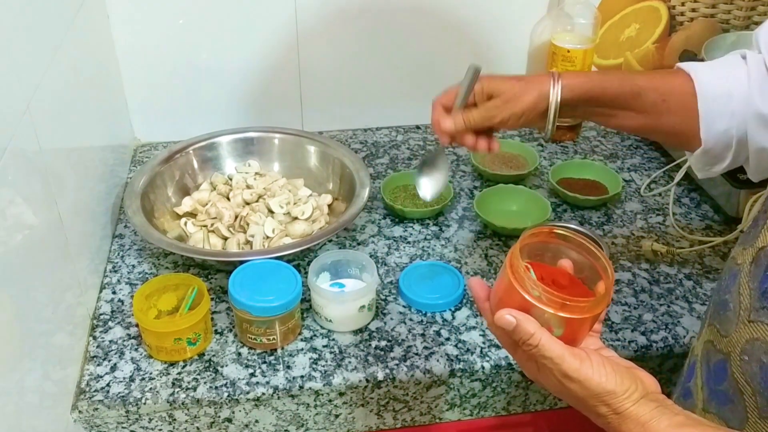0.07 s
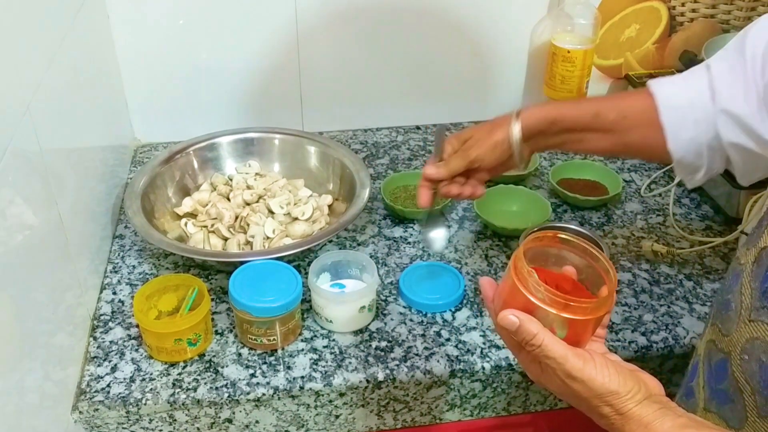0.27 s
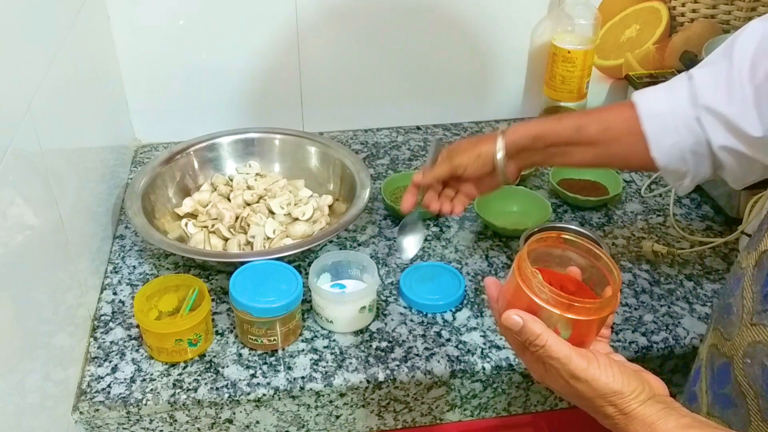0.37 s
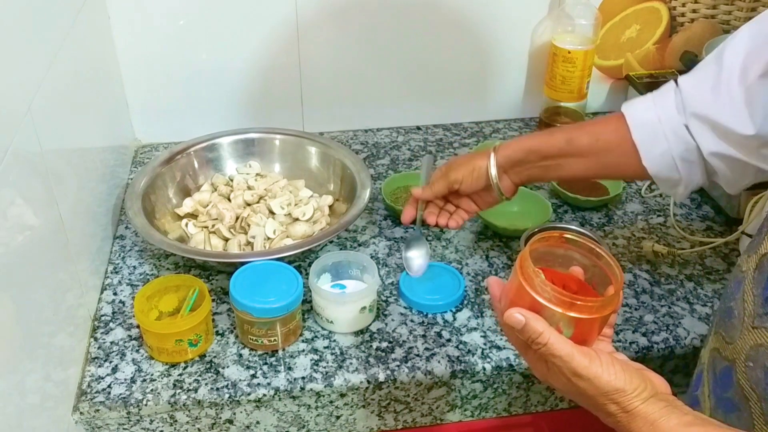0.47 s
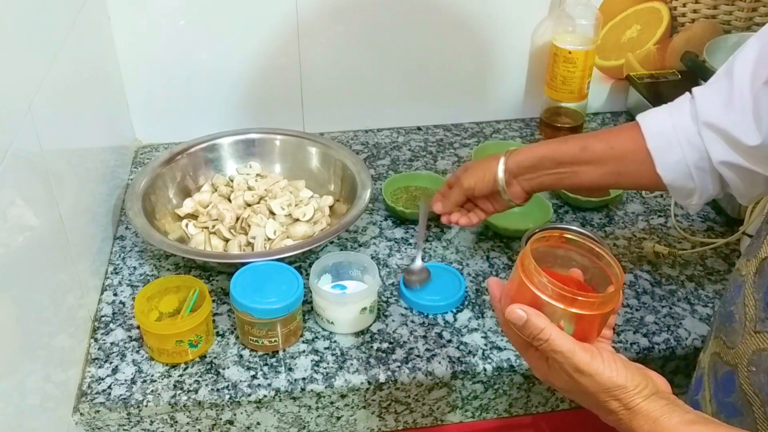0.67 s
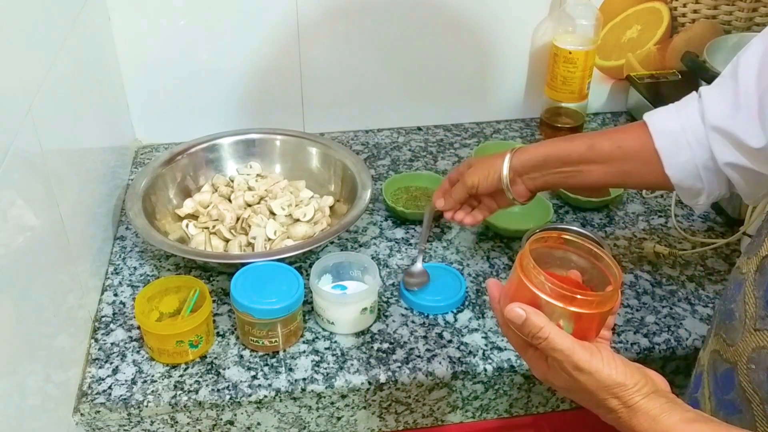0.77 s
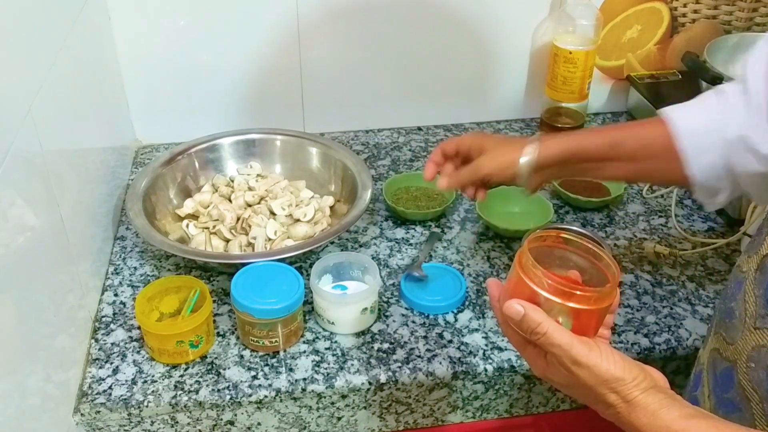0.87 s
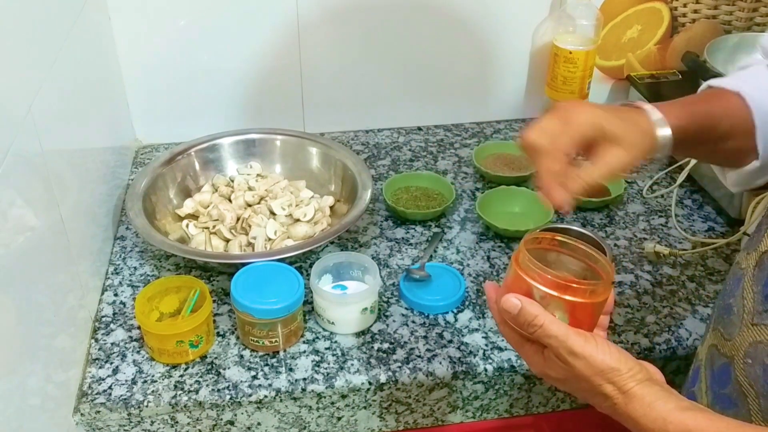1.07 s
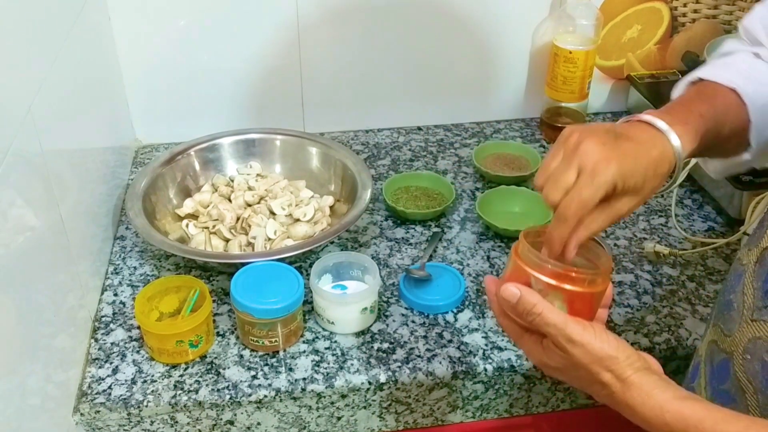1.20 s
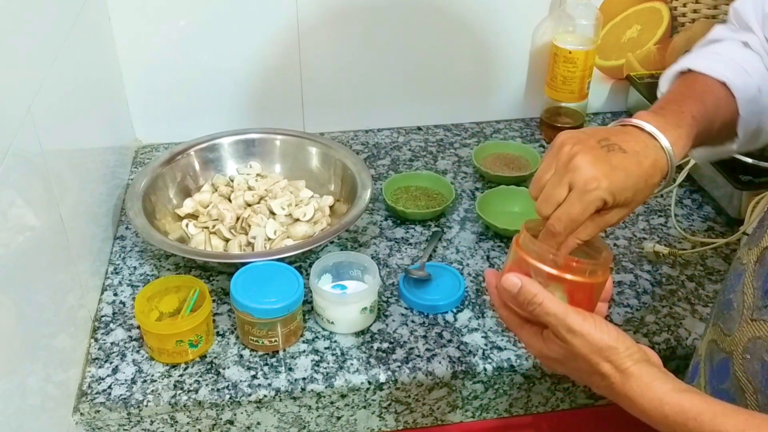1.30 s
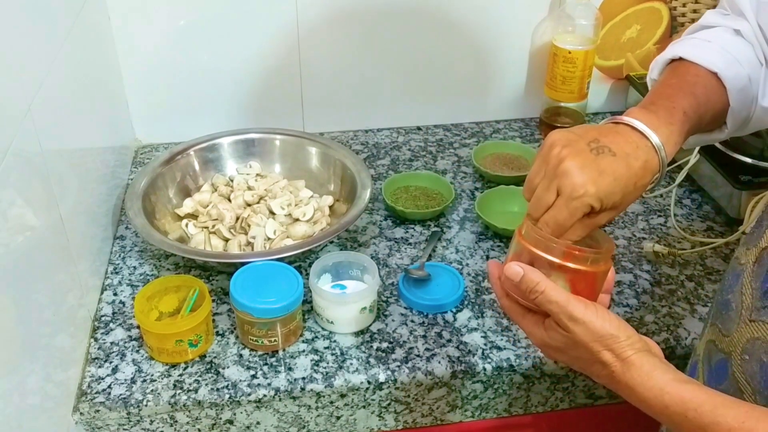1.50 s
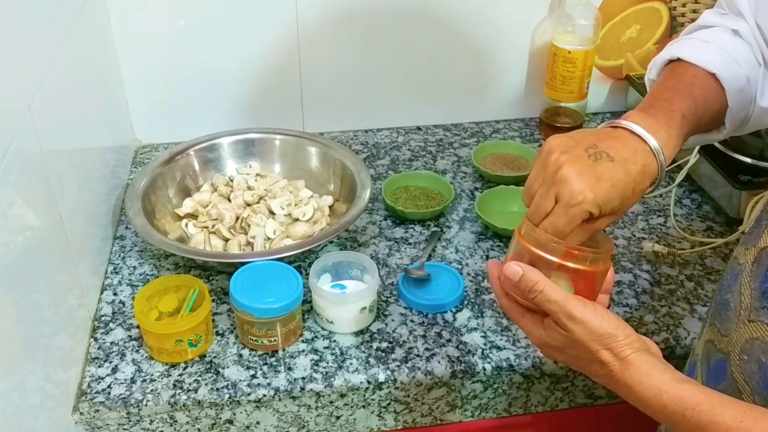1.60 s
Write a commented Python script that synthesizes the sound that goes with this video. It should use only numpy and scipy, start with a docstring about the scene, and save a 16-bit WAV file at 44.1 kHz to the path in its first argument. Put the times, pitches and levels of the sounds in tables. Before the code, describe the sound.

A small steel spoon is put down on a plastic lid, with a hollow knock at about 0.2 seconds. A bright ringing clink comes at 0.5 seconds, strongest on the left, then another at 0.65 and small rattling bounces that settle by 0.9. The tiled kitchen adds a short echo. From about 1.1 to 1.6 seconds, fingers rustle faintly in a jar over low room tone.

```python
"""Spoon on a plastic lid

A small steel spoon is put down on a plastic lid on a stone counter: a knock, a ringing clink, a rattle
as it settles. The lid answers the bounces with a hollow note and the tiled kitchen echoes; fingers
rustle faintly in a jar over a low room tone. The left microphone gets most of the treble, so its
limiter ducks at the clink and slowly recovers."""
import sys
import numpy as np
from scipy import signal
from scipy.fft import rfft, irfft
from scipy.io import wavfile
from scipy.ndimage import uniform_filter1d, minimum_filter1d

SR = 44100
rng = np.random.default_rng(int(sys.argv[2]) if len(sys.argv) > 2 else 0)


def wav_out(sig):
    """Save sig, one row per channel (or a flat mono array), as 16-bit PCM at SR to the path in sys.argv[1]."""
    wavfile.write(sys.argv[1], SR, np.round(np.clip(np.atleast_2d(sig).T, -1, 1) * 32767).astype(np.int16))


N = 72765

# room tone EQ: f/Hz, relative level/dB
ROOM_TONE_EQ = [(12, -25), (20, 12), (142, 3), (172, -4.5), (262, 0.5), (319, -8), (472, -7.5), (1220, -21),
                (2390, -19.5), (3530, -25.5), (9670, -27.5), (16000, -41)]
# hand, sleeve and jar noises: peak t/s, half-width/s, level/dB, centre f/Hz
RUSTLES = [(-0.005, 0.16, -58, 4950), (0.145, 0.22, -52, 710), (0.459, .012, -37, 81),
           (1.15, 0.081, -49.5, 675), (1.284, 0.11, -56.5, 5800), (1.542, 0.017, -59.5, 7900),
           (1.596, 0.0043, -50.5, 3400)]
# hard contacts of the spoon: t/s, level/dB, tilt/(dB/octave), treble edge f/Hz, decay/s, jingle send 0-1
CONTACTS = [(0.2321, -6, -1.5, 8300, 0.00057, 0), (0.2354, -5.5, 1, 6970, 0.0019, 0),
            (0.2505, -17, -2.5, 8060, 0.0013, 0), (0.2785, -20.5, -7, 7000, 0.0018, 0),
            (0.4867, 6, 3.5, 11400, 0.0032, 0.4), (0.4889, 1.5, 2, 9700, 0.0032, 0.7),
            (0.6524, -4, 2.5, 10600, 0.0028, 0), (0.7001, -14, -1, 7040, 0.0023, 1),
            (0.735, -10.5, 2, 10100, 0.0027, 0.4), (0.78, -16, 4.5, 7000, 0.0026, 0.8),
            (0.7992, -13.5, 0, 7200, 0.0031, 0.35), (0.8236, -12.5, 0, 6260, 0.0023, 0.3),
            (0.87, -24, -4, 5360, 0.0038, 1), (0.877, -12, 8, 12500, 0.0022, 0.27),
            (0.8961, -16, -0.5, 10100, 0.0023, 0.2)]
# base EQ of a contact: f/Hz, relative level/dB
CONTACT_EQ = [(60, -14), (200, -21.5), (400, 2.5), (700, -1.5), (1300, 1.5), (2200, -0.5), (4000, -2),
              (6000, -5.5), (9500, -2), (11500, -9.5), (13500, -13), (16000, -56)]
# extra EQ on the contacts at the right microphone: f/Hz, gain/dB
RIGHT_MIC_EQ = [(100, -2.5), (800, 1), (1500, -4), (2500, -3.5), (4500, -14.5), (8000, -19), (11000, -16.5),
                (15000, 5)]
# blows that reach the lid: t/s, level/dB, pitch ratio, tilt about the hollow note/(dB/octave)
KNOCKS = [(0.233, -21, 1, -2), (0.2415, -10.5, 1.052, -0.5), (0.258, -13.5, 1.044, 0.5),
          (0.286, -22, 1.02, -3), (0.307, -20, 1.01, 2.5), (0.487, -17, 0.89, -2.5), (0.496, -13, 1.02, 6),
          (0.509, -8.5, 1.03, 6), (0.53, -11.5, 1.13, -1), (0.544, -12, 1.094, 0), (0.568, -19, 1.06, 6.5),
          (0.648, -9, 0.98, -0.5), (0.70, -26.5, 1.4, -3.5), (0.748, -15, 1, 2), (0.789, -13.5, .97, 0.5),
          (0.808, -17.5, 0.92, 0), (0.835, -20.5, .95, -2), (0.897, -18.5, 0.9, -2)]
# the lid's modes: f/Hz, relative level/dB, t60/s
LID_MODES = [(117.3, -25.5, 0.3), (187.7, -20.5, 0.18), (276.2, -22, 0.27), (384.6, -9, 0.086),
             (459.7, -19, 0.25), (581.5, -16, 0.18), (703, -14, 0.047), (733.5, 0.5, 0.048),
             (781.4, -3.5, 0.048), (863, -28.5, 0.035)]
# the lid's stereo balance: left gain/dB, right gain/dB
LID_PAN_DB = [-3.5, -1]
# strikes that ring the spoon, each at another place (the fingers damp the first): t/s, base t60/s
STRIKES = [(0.233, 0.079), (0.489, 1.17), (0.651, 1.1), (0.878, 0.32)]
# the spoon's modes: f/Hz
SPOON_HZ = [3532, 3806, 4576, 4872, 4958, 6573, 6789, 7713, 8264, 8850, 9130, 9245, 10254, 10384, 11713,
            12037, 12465, 13915, 14910, 15069]
# a row per spoon mode: level/dB at each of the four strikes, right minus left/dB, ratio to the base t60
SPOON_VOICING = [(-38, -14.5, -24, -34.5, -10, 1.2), (-46, -31, -43, -43, -2.5, 0.62),
                 (-39, -27.5, -26, -32, -1.5, 0.45), (-46, -38, -35, -39, -15, 1.87),
                 (-39, -19.5, -38, -30.5, -7.5, 0.83), (-42, -15.5, -26.5, -35, -15, 0.88),
                 (-39, -9.5, -30.5, -28, -17, 1), (-20, -4.5, -26.5, -27.5, -15.5, 0.93),
                 (-33, -9, -17.5, -48, -19, 0.71), (-33, -16, -44, -48, -19, 0.51),
                 (-36, -25, -34, -44, -18, .6), (-38, -24, -41, -36, -19, 0.34),
                 (-39, -8, -21.5, -19.5, -19, 0.93), (-20, -7.5, -19, -26, -17, 0.84),
                 (-36, -43, -20, -32, -28.5, 0.81), (-46, -28, -21, -23, -12.5, 0.85),
                 (-56, -27, -28, -36, -14, 0.28), (-60, -11.5, -19, -21, -10, 0.49),
                 (-58, -31, -23, -59, -11, 0.41), (-57, -15, -15, -53, -5, 0.23)]
# reverb time of the kitchen: f/Hz, t60/s
KITCHEN_T60 = [(100, 0.94), (260, 0.84), (700, 0.51), (1800, 0.57), (5000, 0.36), (13000, 0.39)]
# the spoon skids on the lid: peak t/s, half-width/s, level/dB, resonance f/Hz
SKIDS = [(0.715, 0.0083, -30, 1563), (0.814, 0.034, -36, 2495)]


def undb(db):
    """Decibels to amplitude."""
    return 10 ** (np.asarray(db) / 20)


def unit(x):
    """Scale to rms 1."""
    return x / np.sqrt(np.mean(x ** 2))


def freqs():
    """Frequency of each spectral bin, at least 1 Hz."""
    return np.maximum(np.arange(N // 2 + 1) * SR / N, 1)


def curve(points):
    """A table read at every bin, on a log frequency axis."""
    hz, value = np.array(points).T
    return np.interp(np.log(freqs()), np.log(hz), value)


def colour(x, gain):
    """EQ by a gain per bin."""
    return irfft(rfft(x) * gain, N)


def minimum_phase(gain):
    """Short, front-loaded impulse response with this EQ shape and unit energy."""
    cepstrum = irfft(np.log(gain + 1e-9), N)
    cepstrum[1:N // 2] *= 2
    cepstrum[N // 2:] = 0
    impulse = irfft(np.exp(rfft(cepstrum)), N)[:512]
    return impulse / np.sqrt(np.sum(impulse ** 2))


def since(start):
    """Seconds since an event, zero before it."""
    return np.maximum(np.arange(N) / SR - start, 0)


def in_room(x, echo, wet_db):
    """Direct sound plus its reverb."""
    return x + undb(wet_db) * signal.fftconvolve(np.atleast_2d(x), echo, axes=1)[:, :N]


def room_tone(mid_db=-49.5, width=0.66):
    """A steady bed of low rumble and thin hiss."""
    mid, side = unit(colour(rng.standard_normal((2, N)), undb(curve(ROOM_TONE_EQ))))
    return undb(mid_db) * np.array([mid + width * side, mid - width * side])


def fingers(right_db=-3):
    """Soft brushes and a bump as the hands move: swells of band-limited noise."""
    t, out = since(0), np.zeros((2, N))
    for at, half_width, db, hz in RUSTLES:
        band = np.exp(-np.log2(freqs() / hz) ** 2)
        brush = unit(colour(rng.standard_normal((2, N)), band))
        out += undb(db) * brush * np.exp(-((t - at) / half_width) ** 2)
    return out * undb([[0], [right_db]])


def contacts(echo, edge_damping=0.57):
    """Each contact is a short crack with its own brightness; once let go, the spoon jingles too."""
    ticks, jingle_send = np.zeros((2, 2, N))
    f = freqs()
    for start, db, tilt, edge_hz, decay, send in CONTACTS:
        t = since(start)
        crack = rng.standard_normal((2, N)) * (t > 0) * np.exp(-t / decay)
        edge = 1 / np.hypot(1 - (f / edge_hz) ** 2, edge_damping * f / edge_hz)  # resonant low-pass
        eq_db = curve(CONTACT_EQ) + tilt * np.log2(np.maximum(f, 500))
        tone = minimum_phase(edge * undb(eq_db))
        tick = undb(db) * signal.oaconvolve(crack, tone[None], axes=1)[:, :N]
        ticks += tick
        jingle_send += send * tick
    left, right = in_room(ticks + jingle(jingle_send), echo, wet_db=0)
    return np.array([left, colour(right, undb(curve(RIGHT_MIC_EQ)))])


def kitchen(alike_below_hz=1160, build_s=0.00043, top_hz=10500):
    """Diffuse impulse response of the tiles: lows last longer and are alike at both microphones."""
    t, f = since(0), freqs()
    own, shared = rng.standard_normal((2, N)), rng.standard_normal(N)
    alike = 1 / (1 + (f / alike_below_hz) ** 2)
    spectrum = rfft(colour(own, np.sqrt(1 - alike)) + colour(shared, np.sqrt(alike)))
    hz, t60s = np.array(KITCHEN_T60).T
    echo = np.zeros((2, N))
    for share, t60 in zip(np.eye(len(hz)), t60s):
        band = irfft(spectrum * np.interp(np.log(f), np.log(hz), share), N)
        echo += band * np.exp(-np.log(1000) * t / t60)
    echo *= 1 - np.exp(-t / build_s)
    echo /= np.sqrt(np.sum(echo ** 2, axis=1, keepdims=True))
    absorption = signal.butter(2, top_hz, fs=SR, output="sos")  # air and clutter soak up the top
    return signal.sosfilt(absorption, echo)


def lid(echo, hollow_hz=720, attack_cycles=0.77):
    """Hollow knocks of the lid's modes, lower as the spoon's weight comes to rest on it."""
    out, t = np.zeros(2 * N), since(0)[:N // 2]
    for start, db, pitch, tilt in KNOCKS:
        onset = int(start * SR)
        detunes = 1 + 0.015 * rng.standard_normal(len(LID_MODES))
        for (hz, mode_db, t60), detune in zip(LID_MODES, detunes):
            gain = undb(db + mode_db + tilt * np.log2(hz / hollow_hz))
            envelope = (1 - np.exp(-t * hz / attack_cycles)) * np.exp(-np.log(1000) * t / t60)
            out[onset:onset + len(t)] += gain * envelope * np.sin(2 * np.pi * hz * pitch * detune * t)
    return in_room(out[:N], echo, wet_db=-0.5) * undb(LID_PAN_DB)[:, None]


def rocking(bandwidth_hz=49):
    """Random waver, rms 1: the rocking spoon turns its modes toward and away from the microphones."""
    return unit(colour(rng.standard_normal(N), np.exp(-(freqs() / bandwidth_hz) ** 2)))


def spoon(echo, attack_s=0.004, choke_s=0.005, waver_db=3.5, waver_rad=0.61):
    """Steel modes ring and waver; the place struck sets their balance, and the highest dies first."""
    out = np.zeros((2, N))
    starts, t60s = np.array(STRIKES).T
    ages = np.array([since(start) for start in starts])
    gates = 1 - np.exp(-ages / attack_s)
    gates[:-1] *= np.exp(-ages[1:] / choke_s)  # each strike chokes the ring before it
    for hz, (*strike_db, right_db, sustain) in zip(SPOON_HZ, SPOON_VOICING):
        rings = gates * np.exp(-np.log(1000) * ages / (t60s[:, None] * sustain))
        envelope = undb(strike_db) @ rings * undb(waver_db * rocking())
        phase = 2 * np.pi * rng.random((2, 1)) + waver_rad * rocking()
        out += undb([[0], [right_db]]) * envelope * np.sin(2 * np.pi * hz * since(0) + phase)
    return in_room(out, echo, wet_db=-2.5)


def jingle(ticks, resonance_db=12, t60_s=0.14):
    """A light touch rings the spoon's modes briefly, each time with another phase and strength."""
    rate, t = np.log(1000) / t60_s, since(0)[:N // 4]
    modes = np.cos(2 * np.pi * np.outer(SPOON_HZ, t)).sum(axis=0)
    ring = 2 * rate / SR * np.exp(-rate * t) * modes
    return undb(resonance_db) * signal.fftconvolve(ticks, ring[None], axes=1)[:, :N]


def skids(echo, slips_per_s=600, width_octaves=0.11):
    """The sliding spoon rasps: quick stick-slip ticks through a resonance of the plastic."""
    t, out = since(0), np.zeros(N)
    for at, half_width, db, hz in SKIDS:
        slips = (rng.random(N) < slips_per_s / SR).astype(float)
        resonance = np.exp(-(np.log2(freqs() / hz) / width_octaves) ** 2)
        rasp = unit(colour(slips, resonance))
        out += undb(db) * rasp * np.exp(-((t - at) / half_width) ** 2)
    return in_room(out, echo, wet_db=-1.5)


def scene():
    """Spoon and lid share one kitchen reverb; fingers and room tone stay dry."""
    echo = kitchen()
    return contacts(echo) + lid(echo) + spoon(echo) + skids(echo) + fingers() + room_tone()


def record(dry, threshold_db=-13.5, detect_s=0.0053, release_db_per_s=61.5, cut_hz=16000):
    """A limiter per channel, quick to duck and slow to recover, then a hard clip and a steep high cut."""
    window = int(detect_s * SR)
    power_db = 10 * np.log10(np.maximum(uniform_filter1d(dry ** 2, window, axis=1), 1e-12))
    duck_db = minimum_filter1d(np.minimum(threshold_db - power_db, 0), window, axis=1)
    recovery_db = release_db_per_s * since(0)
    gain_db = np.minimum.accumulate(duck_db - recovery_db, axis=1) + recovery_db
    limited = dry * undb(uniform_filter1d(gain_db, window, axis=1))
    high_cut = signal.ellip(8, 0.2, 70, cut_hz, fs=SR, output="sos")
    return signal.sosfilt(high_cut, np.clip(limited, -1, 1))


dry = scene()
out = record(dry)
wav_out(out)
```